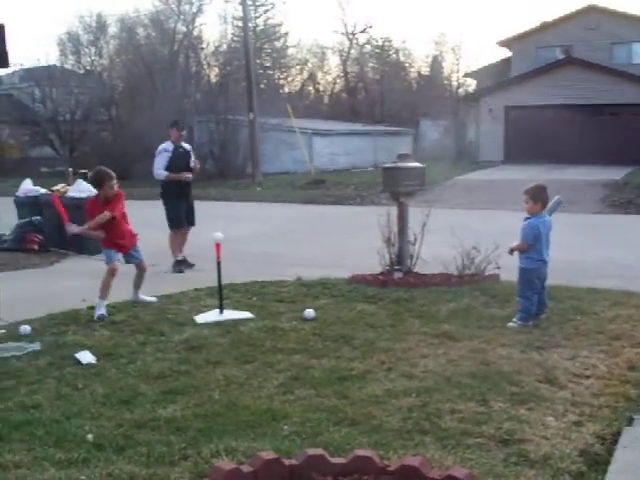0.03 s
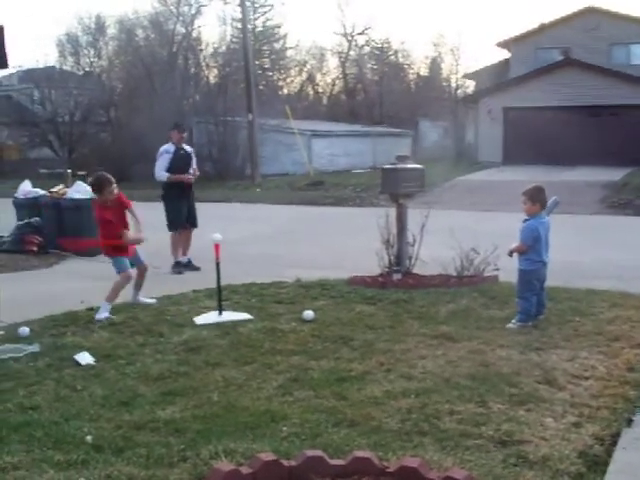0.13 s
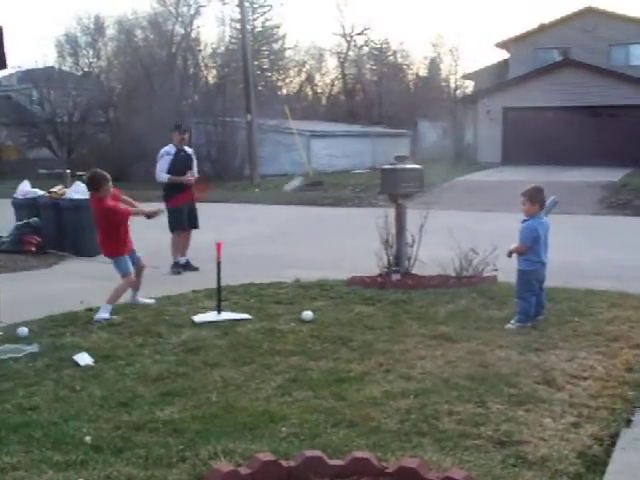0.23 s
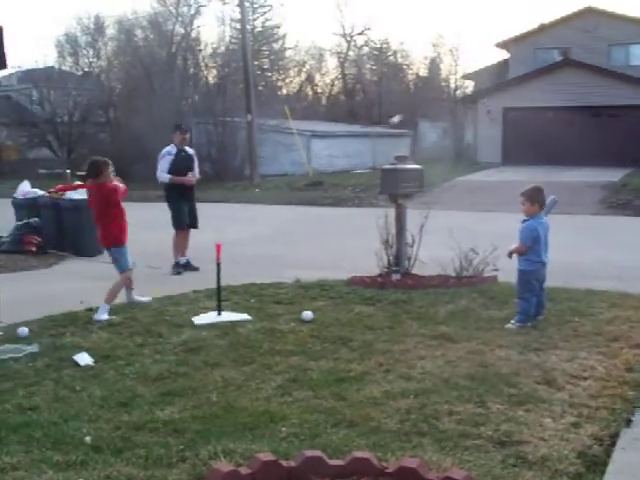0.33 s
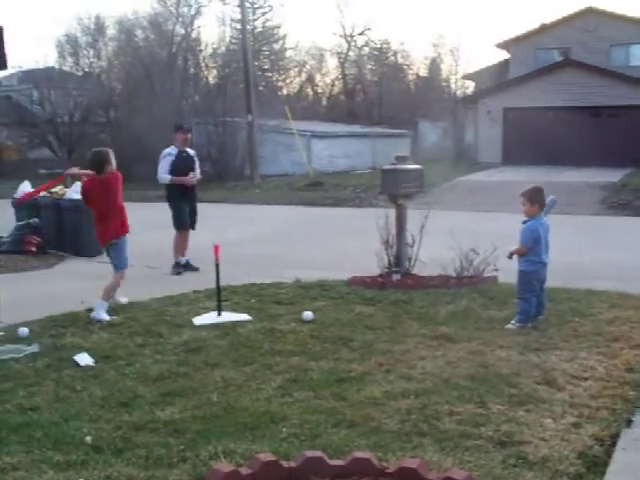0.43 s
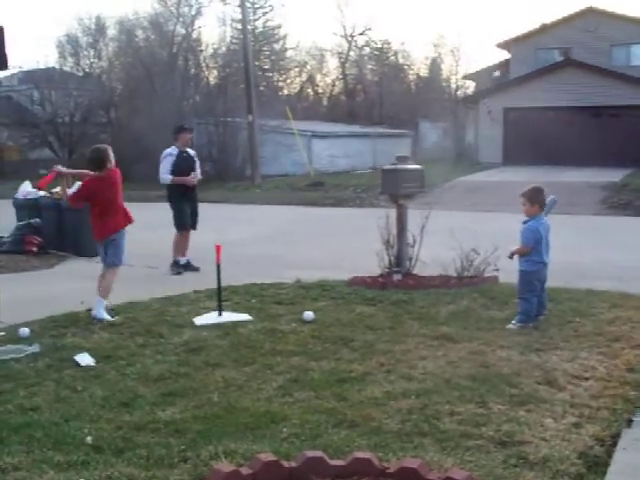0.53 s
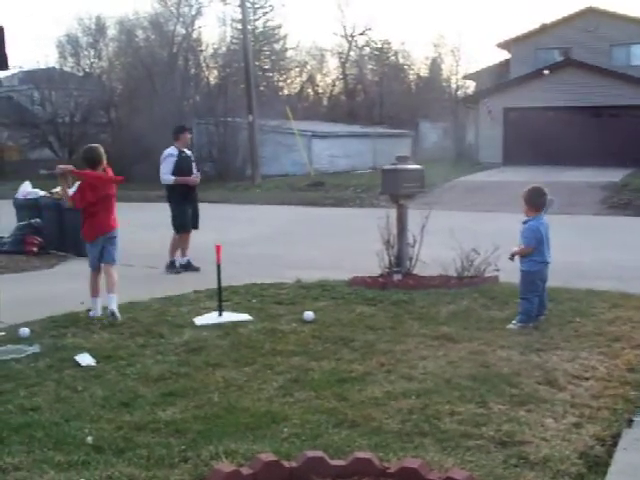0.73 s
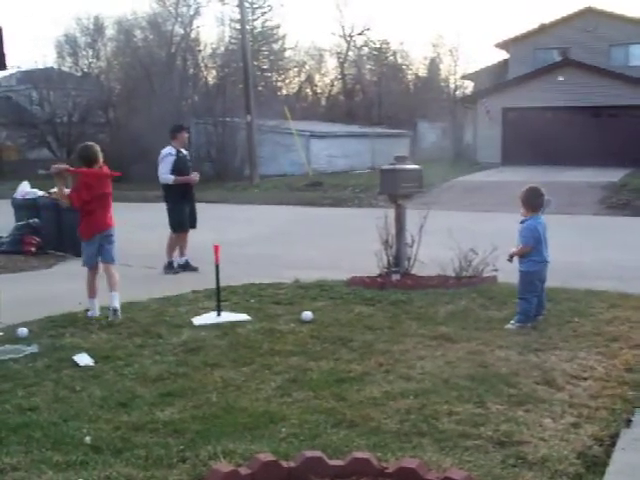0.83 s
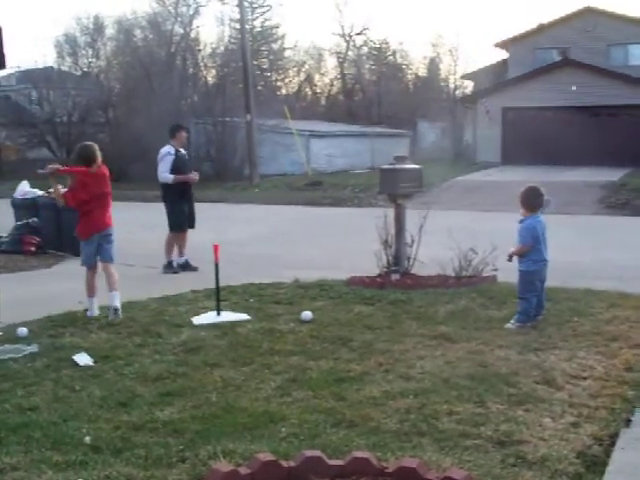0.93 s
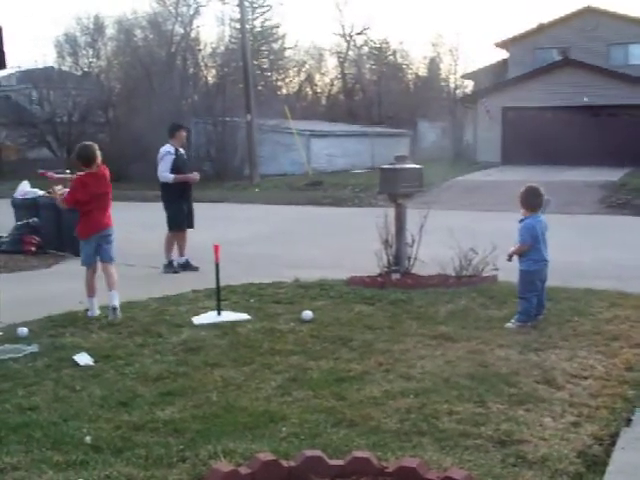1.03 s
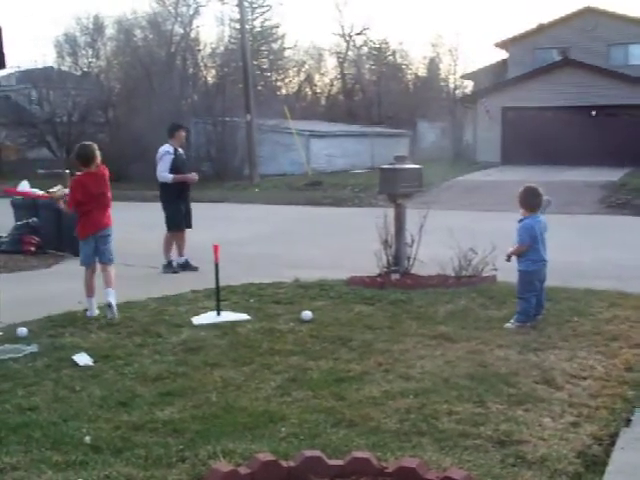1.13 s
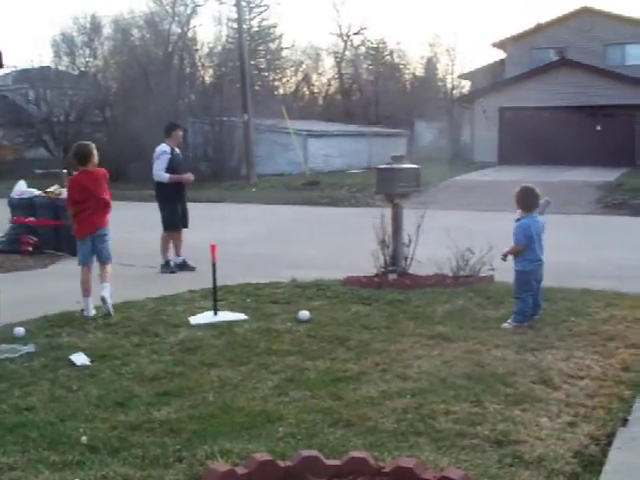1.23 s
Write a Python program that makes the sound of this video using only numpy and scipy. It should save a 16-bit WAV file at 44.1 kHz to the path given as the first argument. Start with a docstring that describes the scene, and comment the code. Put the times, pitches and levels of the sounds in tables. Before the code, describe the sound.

A hollow plastic bat cracks a ball off a batting tee in a quiet front yard

```python
"""A hollow plastic bat cracks a ball off a batting tee in a front yard: decaying tones plus a snap of noise.
Shaped noise makes the swish of the bat, the scuffs of shoes, the yard's reflections and the houses' faint echo.
The tee is knocked just after the crack, as a set of dull ringing tones with a light rattle of noise.
Small birds chirp and whistle as gliding and held tones, over a distant traffic rumble and a faint whine.
The crack overloads the microphone and pushes its gain down; the gain then creeps back up."""
import sys
import numpy as np
from scipy import signal
from scipy.fft import rfft, irfft
from scipy.io import wavfile

SR = 44100
rng = np.random.default_rng(int(sys.argv[2]) if len(sys.argv) > 2 else 0)


def log_audio(samples):
    """Write samples as a 16-bit WAV file to the path given in sys.argv[1]."""
    # one column per channel
    frames = np.atleast_2d(samples).T
    # limit to full scale, then quantise
    limited = np.clip(frames, -1, 1)
    pcm = np.round(limited * 32767).astype(np.int16)
    wavfile.write(sys.argv[1], SR, pcm)


N = 57330
TIME = np.arange(N) / SR   # seconds
HIT_S = 0.2451   # the bat meets the ball
CUTOFF_HZ = 16500   # top of the snap and of the final sound


def from_db(db):
    """Turn decibels into a gain."""
    return 10 ** (np.asarray(db) / 20)


def rms_one(x):
    """Scale a sound to unit power."""
    return x / np.sqrt(np.mean(x ** 2) + 1e-20)


def cut(x, hz, kind, order):
    """Keep only what lies above ("high") or below ("low") a pitch, with a Butterworth filter."""
    return signal.sosfilt(signal.butter(order, hz, kind, fs=SR, output="sos"), x)


def noise(spectrum):
    """Make noise of unit power whose strength at each pitch follows a table."""
    table_hz, table_db = np.transpose(spectrum)
    bins_hz = np.maximum(np.arange(N // 2 + 1) * SR / N, 1)
    gain = from_db(np.interp(np.log(bins_hz), np.log(table_hz), table_db))
    gain = gain / (1 + (.5 * table_hz[0] / bins_hz) ** 2)   # fade out below the table
    return rms_one(irfft(rfft(rng.standard_normal(N)) * gain, N))


def burst(start, rise, t60):
    """Loudness shape: a straight rise, then a decay that loses 60 dB in t60 seconds."""
    age = TIME - start
    attack = np.clip(age / max(rise, 1 / SR), 0, 1)
    return attack * np.exp(-np.log(1000) * np.maximum(age - rise, 0) / t60)


def strike(start, modes):
    """One blow sets every natural tone (mode) of a body ringing, and each dies away at its own rate."""
    age = np.maximum(TIME - start, 0)
    ring = 0
    for hz, db, t60 in modes:
        ring = ring + from_db(db) * np.sin(2 * np.pi * hz * age) * np.exp(-np.log(1000) * age / t60)
    return -ring   # the first push is negative


# Distant traffic and air, as a noise colour: (pitch [Hz], relative level per Hz [dB])
AIR_COLOUR = [(15, -43), (25, -0.5), (66, -2), (109, -9), (146, -6), (172, -12.5), (242, -16), (273, -15.5),
              (356, -22.5), (957, -18), (2510, -37.5), (2770, -36.5), (3700, -38.5), (4170, -38.5),
              (4480, -39.5), (6760, -40), (8000, -46.5), (10400, -65), (17600, -120)]
AIR_DB = -43
# The wavering hum of a far engine: (time [s], level [dB])
HUM_LEVELS = [(0, -43), (.08, -52.5), (.4, -43), (.68, -48.5), (.9, -55.5), (1.2, -52), (1.3, -60)]
HUM_HZ, HUM_WIDTH_HZ = 142.5, 11


def street():
    """Steady noise for distant traffic; noise through a narrow resonance for the hum of one engine."""
    radius = np.exp(-np.pi * HUM_WIDTH_HZ / SR)
    resonance = [1, -2 * radius * np.cos(2 * np.pi * HUM_HZ / SR), radius * radius]
    hum = signal.lfilter([1, 0, -1], resonance, rng.standard_normal(2 * N))[N:]   # drop the build-up
    hum_db = np.interp(TIME, *np.transpose(HUM_LEVELS))
    return from_db(AIR_DB) * noise(AIR_COLOUR) + from_db(hum_db) * rms_one(hum)


WHINE_HZ, WHINE_DB = 4300, -73.5


def whine():
    """A faint, steady high tone: one pure sine wave."""
    return from_db(WHINE_DB) * np.sqrt(2) * np.sin(2 * np.pi * WHINE_HZ * TIME)   # sqrt(2): level is rms


# The bat swishing through the air, as a noise colour: (pitch [Hz], relative level per Hz [dB])
SWING_COLOUR = [(40, 4), (110, 2.5), (240, 3.5), (450, -13.5), (900, -18), (1800, -19), (3000, -29),
                (6000, -29), (8500, -37)]
SWING_PEAK_S, SWING_WIDTH_S, SWING_DB = 0.21, .04, -44


def swing():
    """A soft whoosh of air noise that swells and fades around the fastest part of the swing."""
    swell = np.exp(-.5 * ((TIME - SWING_PEAK_S) / SWING_WIDTH_S) ** 2)
    return from_db(SWING_DB) * noise(SWING_COLOUR) * swell


# Noise colour of soles on the lawn: (pitch [Hz], relative level per Hz [dB])
SCUFF_COLOUR = [(300, -1), (800, -11), (1400, 10.5), (2200, -0.5), (3000, -9), (4200, 0), (5200, -11.5),
                (6200, -6), (8500, -29)]
# Each scuff: (time [s], rise [s], 60 dB decay [s], level [dB], low edge [Hz])
SHOE_SCUFFS = [(0.1439, .001, 0.054, -41, 500), (.152, 0.0099, 0.046, -41, 800),
               (.68, .024, 0.13, -52.5, 2860), (1.217, 0.0097, 0.041, -56, 2000)]


def shoes():
    """Soles rub on dry grass in short swishes of noise; a higher low edge sounds thinner."""
    total = 0
    for start, rise, t60, db, low_hz in SHOE_SCUFFS:
        rub = rms_one(cut(noise(SCUFF_COLOUR), low_hz, "high", order=2))
        total = total + from_db(db) * rub * burst(start, rise, t60)
    return total


# Ringing tones of bat and ball: (pitch [Hz], relative level [dB], 60 dB decay [s])
BAT_TONES = [(267, -11, 0.032), (338, -10.5, 0.05), (817, 2, 0.016), (900, -43, 0.11), (1544, -15.5, 0.034),
             (1734, -12.5, 0.016), (2147, -17.5, 0.019), (3040, -22.5, 0.021), (3533, -12, 0.013),
             (3960, -23.5, .028), (5530, -19.5, 0.0084), (6330, -57, .018), (6620, -22.5, .018),
             (7600, -35, .012)]
SNAP_DB, SNAP_T60_S, SNAP_LOW_HZ = -14.5, 0.011, 1500


def bat():
    """Contact makes a hard snap of noise and sets the hollow barrel and the ball ringing briefly."""
    band = signal.butter(2, [SNAP_LOW_HZ, CUTOFF_HZ], "band", fs=SR, output="sos")
    hiss = rms_one(signal.sosfilt(band, rng.standard_normal(N)))
    snap = from_db(SNAP_DB) * hiss * burst(HIT_S, 0, SNAP_T60_S)
    return strike(HIT_S, BAT_TONES) + snap


# The crack scattered by ground, bins and walls, as a noise colour: (pitch [Hz], relative level per Hz [dB])
SCATTER_COLOUR = [(60, 0), (150, -7), (240, 0.5), (330, 6), (450, -5), (700, -12), (980, 2.5),
                  (1280, -11.5), (1650, -4.5), (2100, -8), (2650, -20.5), (3500, -13), (4500, -13.5),
                  (6500, -21.5), (8500, -31.5)]
SCATTER_DB, SCATTER_DELAY_S, SCATTER_RISE_S, SCATTER_T60_S = -16, 0.0027, 0.0013, .06
YARD_DB, YARD_T60_S = -27, 0.22   # weaker, longer reflections
# Bounces off nearby things: (delay after the hit [s], level [dB])
NEAR_BOUNCES = [(.0078, -24), (0.0127, -24)]
BOUNCE_T60_S = 0.0076


def yard():
    """Near things scatter the crack at once, some in distinct bounces; farther ones add a faint tail."""
    start = HIT_S + SCATTER_DELAY_S
    near = from_db(SCATTER_DB) * burst(start, SCATTER_RISE_S, SCATTER_T60_S)
    far = from_db(YARD_DB) * burst(start, SCATTER_RISE_S, YARD_T60_S)
    bounces = sum(from_db(db) * burst(HIT_S + delay, 0, BOUNCE_T60_S) for delay, db in NEAR_BOUNCES)
    return noise(SCATTER_COLOUR) * (np.hypot(near, far) + bounces)   # near and far add as powers


# Dull knocks of the tee: (time [s], level [dB])
KNOCKS = [(0.2742, -37), (0.277, -20), (0.2843, -24.5)]
# Ringing tones of the tee: (pitch [Hz], level relative to the knock [dB], 60 dB decay [s])
TEE_TONES = [(110, -9, 0.065), (326, -3, 0.023), (497, -0.5, 0.039), (614, -1, 0.041), (1820, -11, 0.013),
             (2320, -19, 0.022)]
RATTLE_S, RATTLE_DB, RATTLE_T60_S = .274, -31, 0.085


def tee():
    """The tee knocks on its base, ringing dully each time, with a light rattle of noise."""
    rattle_shape = burst(RATTLE_S, SCATTER_RISE_S, RATTLE_T60_S)
    rattle = from_db(RATTLE_DB) * noise(SCATTER_COLOUR) * rattle_shape
    knocks = sum(from_db(db) * strike(start, TEE_TONES) for start, db in KNOCKS)
    return rattle + knocks


ECHO_S = .3715
# Noise colour of the smeared crack: (pitch [Hz], relative level per Hz [dB])
SMEAR_COLOUR = [(300, 4), (900, 0), (1700, 0.5), (2500, -22), (3400, -5.5), (4400, -3.5), (5200, -18),
                (8000, -31)]
SMEAR_DB, SMEAR_T60_S = -38.5, 0.048
# Noise colour of the soft boom: (pitch [Hz], relative level per Hz [dB])
BOOM_COLOUR = [(100, -23), (180, 4), (330, 2), (600, -15.5), (900, -5.5), (2000, -23), (4200, -23.5),
               (8000, -55)]
BOOM_DB, BOOM_T60_S = -38, .35


def house_echo():
    """The houses send the crack back as a short smear of noise, with a soft boom that lasts longer."""
    smear = from_db(SMEAR_DB) * noise(SMEAR_COLOUR) * burst(ECHO_S, 0, SMEAR_T60_S)
    boom = from_db(BOOM_DB) * noise(BOOM_COLOUR) * burst(ECHO_S, SCATTER_RISE_S, BOOM_T60_S)
    return smear + boom


# Chirps, each an arch in pitch: (time [s], length [s], middle pitch [Hz], level [dB],
# sag at both ends [Hz], fall from start to end [Hz])
BIRD_CHIRPS = [(0.698, 0.015, 4130, -54, 60.4, 0), (1.179, 0.023, 3500, -56.5, 248, -1),
               (1.204, 0.028, 3410, -53.5, 328, 329)]
# A thin whistle on one pitch: (time [s], 60 dB decay [s], level [dB])
BIRD_WHISTLES = [(0.718, 0.34, -54), (.82, 0.38, -66)]
WHISTLE_HZ, WHISTLE_RISE_S = 2870, 0.012


def birds():
    """Birds sing nearly pure tones: quick chirps arched in pitch, and a whistle held on one pitch."""
    whistle_level = sum(from_db(db) * burst(start, WHISTLE_RISE_S, t60) for start, t60, db in BIRD_WHISTLES)
    song = np.sin(2 * np.pi * WHISTLE_HZ * TIME) * whistle_level
    for start, length, middle_hz, db, sag_hz, fall_hz in BIRD_CHIRPS:
        along = np.clip((TIME - start) / length, 0, 1)   # 0 to 1 through the chirp
        hz = middle_hz - sag_hz * (2 * along - 1) ** 2 - fall_hz * (along - .5)
        tone = np.sin(2 * np.pi * np.cumsum(hz) / SR)
        song = song + from_db(db) * np.sin(np.pi * along) * tone
    return song


RADIATE_LOW_HZ = 90   # small bodies radiate little below this


def scene():
    """Add everything up at one microphone."""
    crack = cut(bat() + tee(), RADIATE_LOW_HZ, "high", order=1)
    background = street() + whine()
    return (background + swing() + shoes() + crack + yard() + house_echo() + birds())[None]


def flatten(x, top):
    """Overload: squash peaks smoothly against a ceiling."""
    return x / (1 + (x / top) ** 8) ** (1 / 8)


GAIN_THRESHOLD_DB, GAIN_ATTACK_S, GAIN_RELEASE_DB_PER_S = -2.5, 0.0022, 1.5
OVERLOAD, CEILING = 0.71, 0.87   # input and output limits, as amplitudes
BANDWIDTH_HZ = 8130


def record(dry):
    """Gain control ducks on the crack and recovers slowly; input and output each overload, then lose treble."""
    over_db = np.maximum(20 * np.log10(np.abs(dry) + 1e-9) - GAIN_THRESHOLD_DB, 0)
    # hold the largest excess so far, letting it shrink at the release rate
    recovery_db = GAIN_RELEASE_DB_PER_S * TIME
    held_db = np.maximum.accumulate(over_db + recovery_db, axis=-1) - recovery_db
    # the gain takes a moment to react
    keep = np.exp(-1 / (GAIN_ATTACK_S * SR))
    ducked = dry * from_db(-signal.lfilter([1 - keep], [1, -keep], held_db))
    narrow = cut(flatten(ducked, OVERLOAD), BANDWIDTH_HZ, "low", order=24)
    return cut(flatten(narrow, CEILING), CUTOFF_HZ, "low", order=16)


dry = scene()
out = record(dry)
log_audio(out)
```